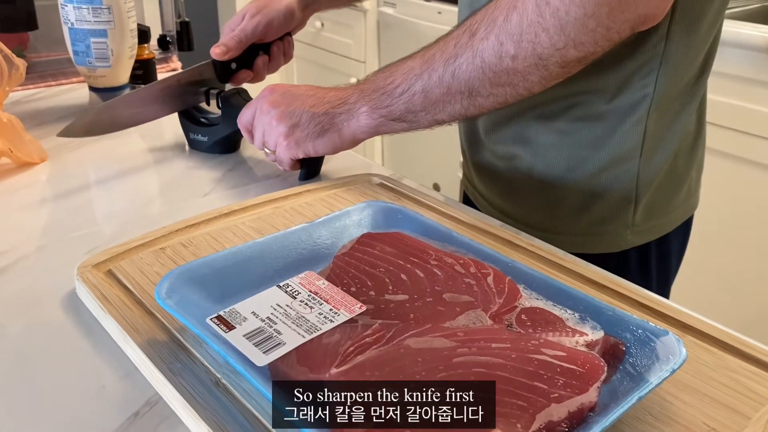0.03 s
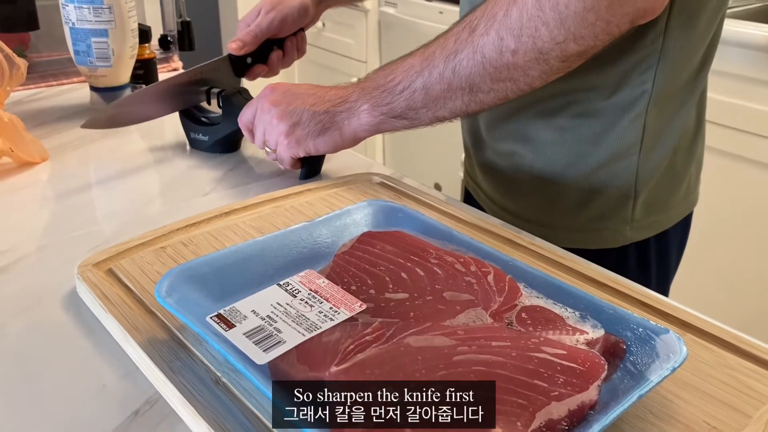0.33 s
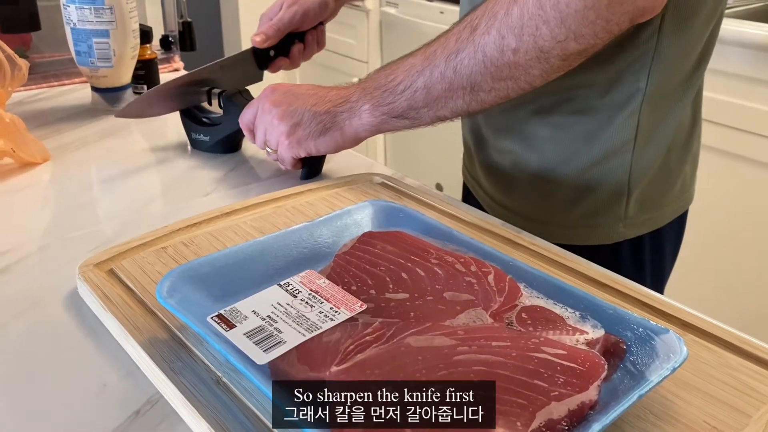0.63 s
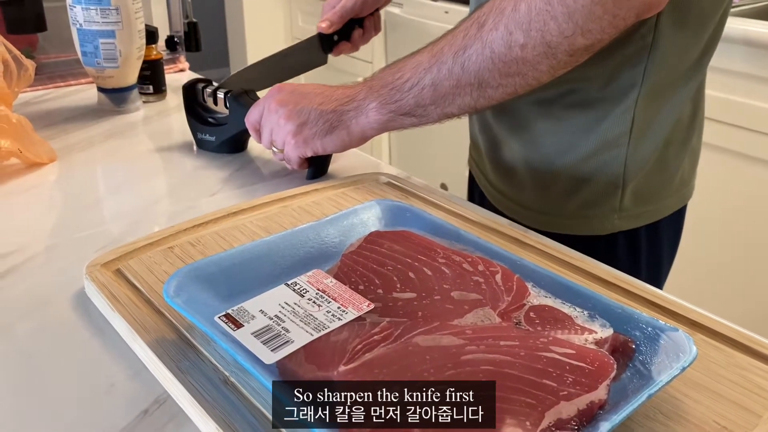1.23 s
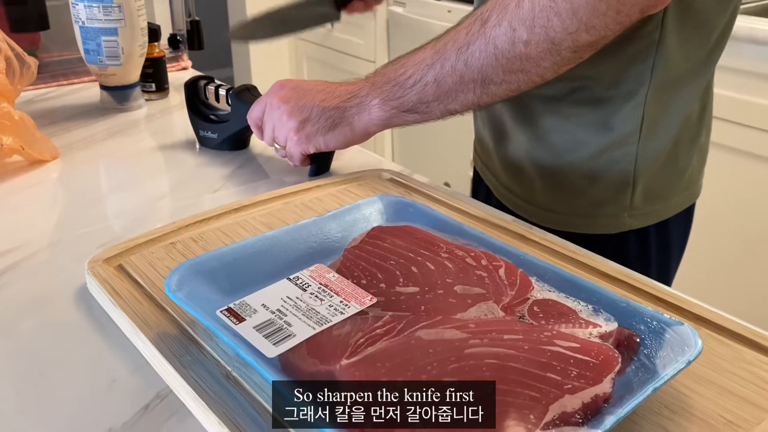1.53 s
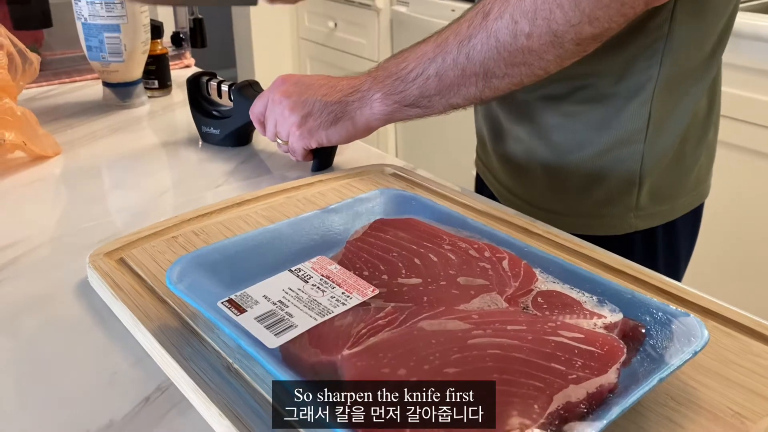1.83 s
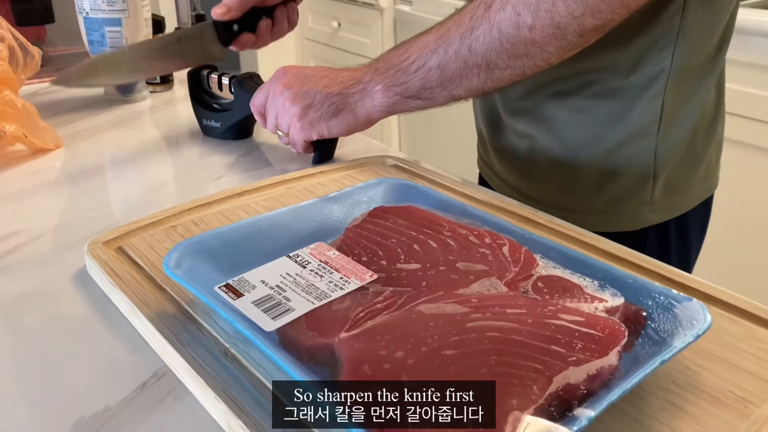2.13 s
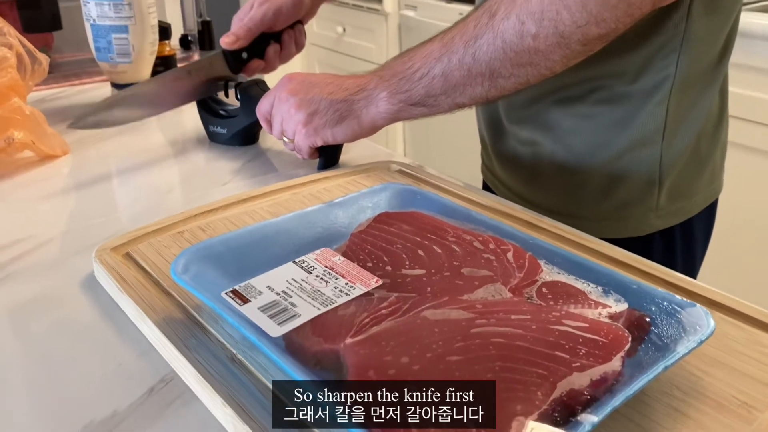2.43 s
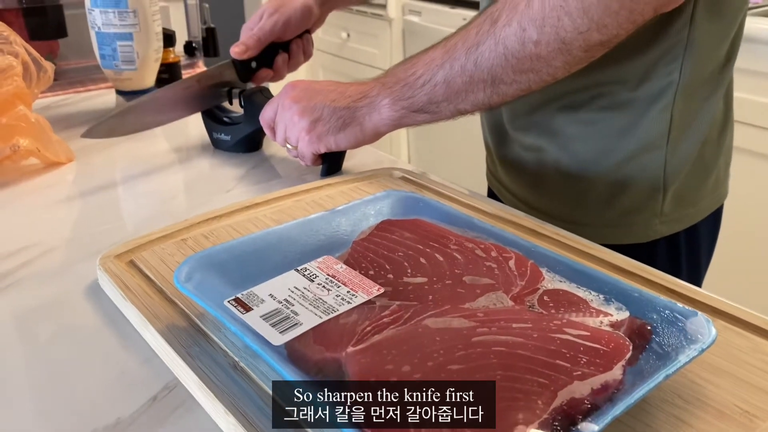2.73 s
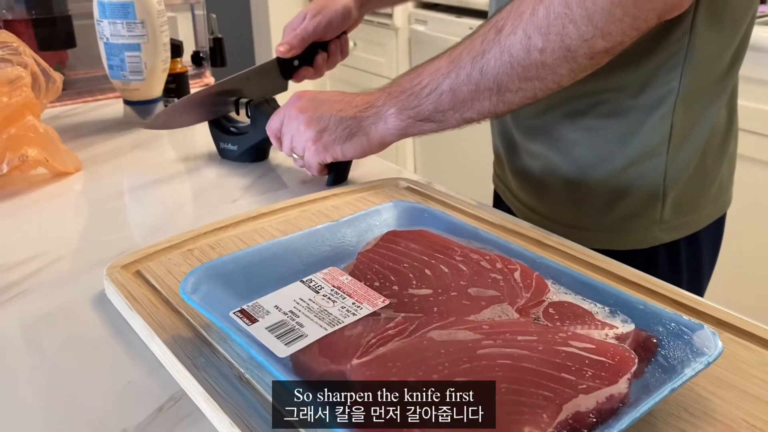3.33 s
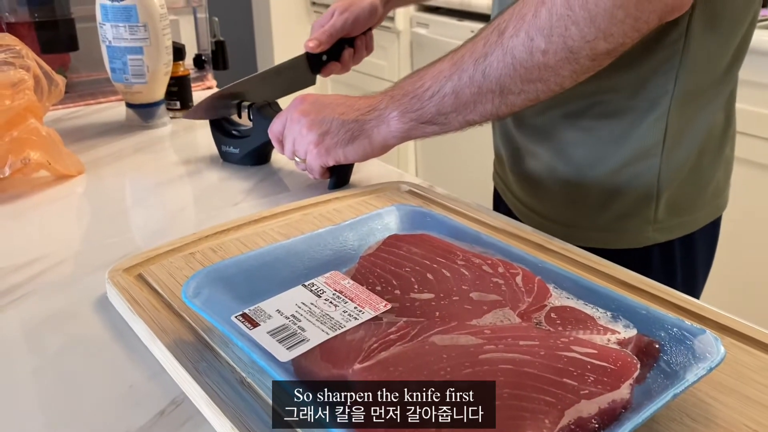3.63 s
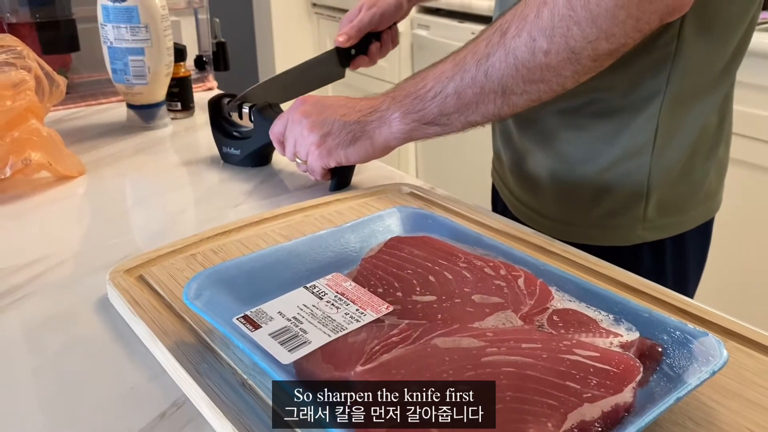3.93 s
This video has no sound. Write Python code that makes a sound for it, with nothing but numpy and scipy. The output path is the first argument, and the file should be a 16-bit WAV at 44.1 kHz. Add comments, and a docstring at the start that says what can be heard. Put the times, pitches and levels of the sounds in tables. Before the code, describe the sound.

Two gritty, metallic scrapes of a kitchen knife drawn through a sharpener, with small clicks between.

```python
"""A kitchen knife is drawn twice through a hand-held sharpener standing on a stone counter. Grit catches the
edge in dense tiny ticks that ring the blade, with brief squeals and a plastic rattle. The tip flicks out of the
slot, the blade clicks back in, and the counter rumbles and thuds underneath. The kitchen adds a short reverb;
at the back two motors hum and beat slowly against each other, over fan and air."""
import sys
import numpy as np
from scipy import signal
from scipy.fft import rfft, irfft
from scipy.io import wavfile

SR = 44100
rng = np.random.default_rng(int(sys.argv[2]) if len(sys.argv) > 2 else 0)


def transcribe(signal):
    """Save signal, clipped to [-1, 1], as a 16-bit WAV file at the path in sys.argv[1]."""
    frames = np.atleast_2d(signal).T
    limited = np.clip(frames, -1, 1)
    pcm = np.round(limited * 32767).astype(np.int16)
    wavfile.write(sys.argv[1], SR, pcm)


N = 176400

# Envelopes, one list per stroke. Each row: time in seconds, level in dB.
EDGE_FORCE = [
    [(0, -55), (.38, -49), (.5, -48.5), (.57, -50), (.63, -46), (.76, -44), (1.03, -46.5), (1.27, -48.5),
     (1.335, -46)],
    [(2.54, -76), (2.71, -62.5), (2.93, -57), (3.09, -48.5), (3.13, -51), (3.25, -44.5), (3.3, -49.5),
     (3.44, -41.5), (3.55, -39), (3.59, -44), (3.7, -47.5), (3.88, -49.5), (3.93, -46.5), (4.0, -48.5)],
]  # the edge pressing on the abrasive
BLADE_RINGING = [
    [(0, -8), (.3, -8.5), (.57, -6.5), (.65, -8), (.85, -7.5), (1.03, -5.5), (1.17, -9), (1.24, -9),
     (1.32, -16)],
    [(2.55, -5), (2.85, -5), (3.1, -7), (3.25, -1.5), (3.33, -7.5), (3.45, -9), (3.55, -8.5), (3.7, -6),
     (4.0, -4.5)],
]  # strongest with the middle of the blade in the slot
HOUSING_RATTLE = [
    [(0, -54), (.17, -59.5), (.5, -55.5), (.75, -51.5), (.9, -54.5), (1.16, -50.5), (1.23, -53),
     (1.28, -50.5), (1.335, -66)],
    [(2.65, -63), (2.85, -65), (3.09, -54.5), (3.25, -53.5), (3.33, -53), (3.54, -47), (3.66, -60),
     (3.78, -56.5), (3.93, -46.5), (4.0, -52.5)],
]
# Tone of the steel. Each row: frequency in Hz, gain in dB.
SCRAPE_EQ = [(400, -57), (1100, -30), (1750, -12), (2200, -5.5), (2700, -3), (3150, -1), (3600, -3),
             (4300, -8), (4900, -5), (5600, -12), (6250, -9.5), (7000, 1.5), (7400, -1.5), (7850, 6),
             (8350, -2), (9200, -0.5), (9900, 5.5), (10900, -1), (11800, -12), (12600, -5), (13900, -23),
             (15000, -12), (16000, -11.5)]
CLICK_EQ = [(500, -21), (1300, -9.5), (2500, -7), (3400, -10), (4200, 0), (5200, -8.5), (6200, 1),
            (7000, 0.5), (8000, 8), (9000, -11), (10500, -4), (12000, -17), (14000, -17), (15500, -19)]
# Blade mode pitches in Hz, then one row per pitch. Each row: level in dB, T60 in seconds.
BLADE_HZ = (1290, 1585, 1975, 2449, 2506, 2810, 3002, 3130, 3190, 3275, 3400, 3820, 3910, 4800, 4940, 7860,
            10745, 11097)
BLADE_MODES = [(-13.5, 0.063), (-14.5, 0.1), (-9, 0.061), (-1.5, 0.09), (-2.5, 0.092), (-5, 0.066),
               (0, 0.086), (0.5, .12), (-2.5, 0.11), (-1.5, .06), (-9, 0.056), (-6, 0.13), (-18, .06),
               (-12.5, 0.029), (-8, .035), (-7.5, 0.019), (-9, 0.11), (-1, 0.073)]
# Resonances of knocked steel and plastic. Each row: pitch in Hz, level in dB, T60 in seconds.
TIP_MODES = [(1236, -4, .06), (1980, -5, .06), (3440, 0, .13), (5160, -9, .035), (5930, -7, .035),
             (7520, -6, .09)]
HOUSING_MODES = [(286.5, 6.5, 0.12), (462, 0, 0.023), (595, 4.5, 0.02), (651, -3, 0.068), (724, 0, 0.027),
                 (784.5, 3, 0.067), (876, -0.5, 0.035), (1213, -5, 0.044), (1264, -3.5, 0.019),
                 (1610, -7, 0.03), (1747, -4.5, 0.024)]
# Squeal pitches in Hz, then one row per pitch. Each row: peak time in seconds, level in dB,
# half length in seconds.
SQUEAL_HZ = (7300, 7420, 10200, 3850)
SQUEALS = [(0.85, -50.5, 0.042), (2.94, -57.5, .023), (3.2, -49, .0071), (.74, -53, 0.0072)]
# The blade catches, flicks out and sets down. Each row: start in seconds, steel level in dB,
# housing level in dB, rise and decay in seconds.
KNOCKS = [(1.157, -49, -48, 0.0035, .003), (1.215, -47, -42, .002, 0.0081),
          (1.305, -46, -52, 0.0022, 0.0066), (1.32, -39, -60, 0.0011, 0.0035),
          (2.5099, -52.5, -67, .0004, .006), (2.516, -45, -39.5, 0.00034, 0.0038),
          (3.923, -44, -45.5, 0.0029, 0.0076), (3.974, -54, -42.5, 0.0032, 0.018)]
# Thuds on the counter. Each row: start in seconds, level in dB, pitch in Hz, rise in seconds.
THUDS = [(0.761, -36, 70, 0.011), (.921, -29, 109.5, .012), (.984, -34.5, 63, 0.01),
         (1.213, -39, 318, 0.0081), (1.216, -39.5, 620, 0.003), (1.304, -48, 292, 0.0063),
         (2.511, -39, 166.5, 0.024), (2.514, -39, 229, 0.0097), (3.164, -32, 72.5, 0.0079)]
# Tone of the surroundings. Each row: frequency in Hz, gain in dB.
RUMBLE_EQ = [(20, 1), (45, -6), (60, 35), (90, 38.5), (130, -36), (250, -10), (500, -26)]
REVERB_EQ = [(200, -13.5), (1500, 5.5), (3000, -3.5), (5500, 0), (7000, -14), (15000, -11)]
LEFT_BIAS = [(200, 1), (750, 7.5), (1500, 8), (2500, 5), (5000, 9), (6500, 0.5), (15000, 0)]  # direct sound, left over right
AIR_EQ = [(20, -4.5), (42, -18), (58, 7), (78, -1), (105, 0.5), (135, -2.5), (190, -3), (260, -9),
          (340, -7), (420, -15.5), (800, -22), (1300, -27.5), (1750, -34), (2100, -31), (2600, -38.5),
          (3200, -36), (3800, -42.5), (6500, -48.5), (8000, -43.5), (10000, -39.5), (12000, -52),
          (14000, -62), (16000, -66)]
AIR_WIDTH = [(50, -17.5), (130, -8.5), (280, -5.5), (600, 0), (3000, -2.5), (5500, -2), (7000, -80)]  # side against mid
# Hum harmonic numbers, then the level of each in dB for the first and the second motor.
HUM_HARMONICS = (1, 2, 4)
MOTOR_DB = [-91, -46.5, -58.5]
OTHER_MOTOR_DB = [-57.5, -44, -61.5]
# Fan tones. Each row: pitch in Hz, level in dB.
FAN_TONES = [(166.3, -60), (235, -62), (295, -65), (356, -59), (532.5, -67.5), (592, -74.5), (872, -75.5),
             (1120, -80)]
# Phase between left and right. Each row: frequency in Hz, lead of the left in cycles.
STEREO_PHASE = [(500, 0), (1600, .25), (2500, .07), (4000, .02), (7400, 0), (8500, -.45), (9300, -.53),
                (11000, -1), (11700, -1), (12700, -1.46), (13700, -1.5), (14300, -2)]

GRIT_PER_S, GRIT_SPREAD_DB, JUDDER_HZ, JUDDER_DB = 9000, 3, 116, 0.93
SCRAPE_DB, UPPER_MODES_DB, TIP_RING_DB, RATTLE_DB, RUMBLE_DB, AIR_DB = -1, -4, -6.5, 1.5, -2.5, -44.5
CONTACT_HZ, RELEASE_S = 10, 0.021
ROOM_T60_S, TREBLE_T60_S = 0.31, 0.35
MOTOR_HZ, OTHER_MOTOR_HZ, BEAT_PEAK_S = 58.125, 60.045, .09


def knife(t):
    """Scrape and squeals, with knocks that click on the steel and rattle the housing."""
    plastic = grit(per_s=1200) * envelope(HOUSING_RATTLE, t) * undb(RATTLE_DB)
    click = 0
    crunch = rng.standard_normal((2, N))
    for start, steel_db, housing_db, rise, decay in KNOCKS:
        blow = np.clip((t - start) / rise, 0, 1) * np.exp(-np.maximum(t - start - rise, 0) / decay)
        click = click + undb(steel_db) * blow * crunch[0]
        plastic = plastic + undb(housing_db) * blow * crunch[1]
    knocks = tint(click, CLICK_EQ) + undb(TIP_RING_DB) * ring(click, TIP_MODES, wander_db=-1)
    return scrape(t) + squeals(t) + knocks + ring(plastic, HOUSING_MODES, wander_db=3.0)


def scrape(t):
    """Grit rasps on the edge and rings the blade."""
    force = envelope(EDGE_FORCE, t) * undb(drift(34))  # flutters by about 1 dB
    rasp = grit(GRIT_PER_S) * force
    blade_drive = grit(GRIT_PER_S) * force * envelope(BLADE_RINGING, t)
    modes = [(hz, *row) for hz, row in zip(BLADE_HZ, BLADE_MODES)]
    body = ring(blade_drive, modes, wander_db=4.5)
    shimmer = undb(UPPER_MODES_DB) * ring(rasp, upper_modes(), wander_db=9)
    return undb(SCRAPE_DB) * tint(rasp, SCRAPE_EQ) + body + shimmer


def grit(per_s):
    """Tiny catches of random size, bunched by the judder of the blade."""
    caught = rng.random(N) < per_s / SR
    size = undb(GRIT_SPREAD_DB * np.minimum(rng.exponential(size=N), 4)) * rng.choice([-1, 1], N)
    return unit(caught * size * undb(JUDDER_DB * drift(JUDDER_HZ)))


def upper_modes(count=90, low_hz=3610, high_hz=12390, t60_s=.07):
    """The blade's crowded, unevenly spaced high modes; their levels follow the scrape's tone."""
    pitches = low_hz + (high_hz - low_hz) * (np.arange(count) + rng.random(count)) / count
    return [(hz, np.interp(hz, *np.array(SCRAPE_EQ).T), t60_s) for hz in pitches]


def ring(x, modes, wander_db):
    """Decaying modes of alternating sign, each swelling and fading as the contact passes its nodes."""
    out, t = 0, np.arange(N) / SR
    for k, (hz, db, t60) in enumerate(modes):
        coupling = undb(wander_db * np.clip(rng.standard_normal(80), -2, 2))
        drive = np.interp(t * CONTACT_HZ, np.arange(len(coupling)), unit(coupling))
        radius = np.exp(-np.log(1000) / (t60 * SR))
        feedback = [1, -2 * radius * np.cos(2 * np.pi * hz / SR), radius * radius]
        band = signal.lfilter([1, 0, -1], feedback, x * drive)
        out = out + (-1) ** k * undb(db) * np.sqrt(1 - radius) * band
    return out / np.linalg.norm([undb(db) for _, db, _ in modes])


def squeals(t, waver_hz=155):
    """The edge sticks and slips for a moment at a wavering pitch."""
    waver = waver_hz * drift(196)
    out = 0
    for hz, (peak, db, half_length) in zip(SQUEAL_HZ, SQUEALS):
        swell = undb(db) * np.exp(-((t - peak) / half_length) ** 2)
        out = out + swell * np.sqrt(2) * np.sin(2 * np.pi * np.cumsum(hz + waver) / SR)
    return out


def counter(t):
    """The counter rumbles under the strokes and thuds when the sharpener rocks."""
    rumble = unit(colour(rng.standard_normal(N), RUMBLE_EQ))
    out = rumble * envelope(HOUSING_RATTLE, t) * undb(RUMBLE_DB)
    for start, db, hz, rise in THUDS:
        age = np.maximum(t - start, 0)
        out = out + undb(db) * age / rise * np.exp(1 - age / rise) * np.sin(2 * np.pi * hz * age)
    return out


def kitchen(x, t):
    """Direct sound leaning left, then a short diffuse tail whose treble lasts a touch longer."""
    noise = rng.standard_normal((2, N))
    low = signal.sosfilt(signal.butter(2, 4000, fs=SR, output="sos"), noise)
    tail = low * undb(-60 * t / ROOM_T60_S) + (noise - low) * undb(-60 * t / TREBLE_T60_S)
    tail = tail * (t > .002)  # pre-delay
    tail = tail / np.linalg.norm(tail, axis=1, keepdims=True)
    wet = colour(signal.fftconvolve(x[None], tail, axes=1)[:, :N], REVERB_EQ)
    lean = np.sqrt(gains(LEFT_BIAS))
    direct = irfft(rfft(x, 2 * N) * np.array([lean, 1 / lean]))[:, :N]
    return direct + wet


def hum(t):
    """Two appliance motors run at slightly different speeds, so their hums beat."""
    return sum(undb(db) * np.sqrt(2) * np.cos(2 * np.pi * k * hz * (t - BEAT_PEAK_S))
               for hz, levels in ((MOTOR_HZ, MOTOR_DB), (OTHER_MOTOR_HZ, OTHER_MOTOR_DB))
               for k, db in zip(HUM_HARMONICS, levels))


def fan(t):
    """Faint fan tones waver in pitch and level and drift between left and right."""
    out = 0
    for hz, db in FAN_TONES:
        phase = 2 * np.pi * hz * t + 0.71 * drift(5.4)
        level = undb(db) * np.sqrt(2) * (1 + 0.71 * drift(12.5))
        out = out + level * np.sin([phase + .5 * drift(1.0), phase + .5 * drift(1.0)])
    return out


def air():
    """A steady bed of moving air, nearly mono in the bass."""
    mid, side = colour(rng.standard_normal((2, N)), AIR_EQ)
    return undb(AIR_DB) * (unit(mid) + colour(unit(side), AIR_WIDTH) * np.array([[1], [-1]]))


def envelope(strokes, t):
    """Gain over the strokes, fading fast outside each one."""
    out = 0
    for rows in strokes:
        times, db = np.array(rows).T
        outside_s = abs(t - np.clip(t, times[0], times[-1]))
        out = out + undb(np.interp(t, times, db)) * np.exp(-outside_s / RELEASE_S)
    return out


def drift(hz):
    """Smooth random modulation of rms 1, changing about hz times a second."""
    f = np.arange(N // 2 + 1) * SR / N
    return unit(irfft(rfft(rng.standard_normal(N)) * np.exp(-(f / hz) ** 2), N))


def tint(x, eq):
    """Colour white sound without changing its power."""
    return colour(x, eq) / np.sqrt(np.mean(gains(eq) ** 2))


def colour(x, eq):
    """Minimum-phase EQ."""
    cepstrum = irfft(np.log(gains(eq)))
    fold = np.r_[1, np.full(N - 1, 2), 1, np.zeros(N - 1)]
    return irfft(rfft(x, 2 * N) * np.exp(rfft(cepstrum * fold)))[..., :N]


def gains(eq):
    """Gain at every frequency from (Hz, dB) points."""
    hz, db = np.array(eq, float).T
    return undb(np.interp(np.log(np.arange(N + 1) * SR / (2 * N) + 1), np.log(hz), db))


def undb(db):
    """Decibels to gain."""
    return 10 ** (np.asarray(db) / 20)


def unit(x):
    """Scale to rms 1."""
    return x / np.sqrt(np.mean(x ** 2))


def scene():
    """Knife up front, counter below, the humming kitchen behind."""
    t = np.arange(N) / SR
    return kitchen(knife(t), t) + counter(t) + hum(t) + fan(t) + air()


def record(dry):
    """Left and right swing in and out of phase in the treble, widening the hiss; the top is cut."""
    f = np.arange(N + 1) * SR / (2 * N)
    lead = np.interp(f, *np.array(STEREO_PHASE).T)
    phase_shift = np.exp(2j * np.pi * np.array([0 * lead, -lead]))
    wide = irfft(rfft(dry, 2 * N) * phase_shift)[:, :N]
    return signal.sosfilt(signal.ellip(12, .2, 80, 15750, fs=SR, output="sos"), wide)


dry = scene()
out = record(dry)
transcribe(out)
```